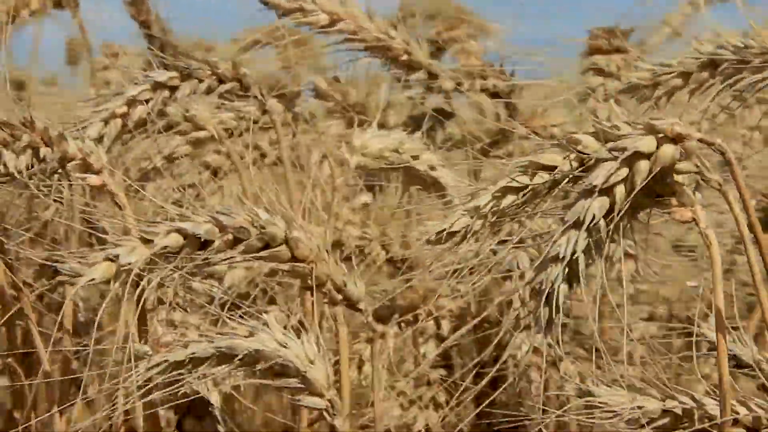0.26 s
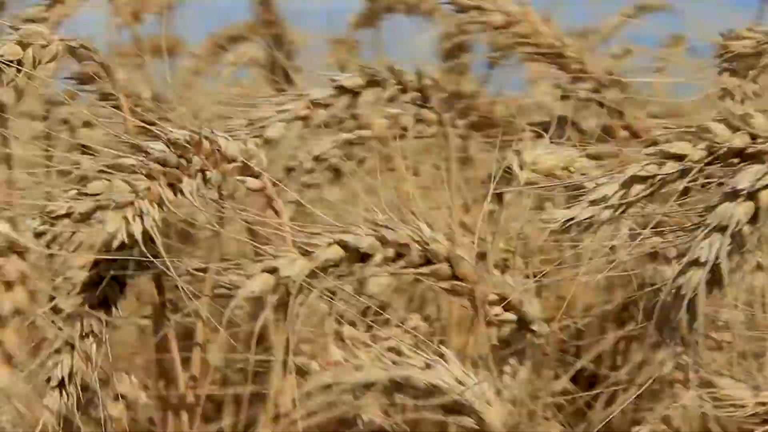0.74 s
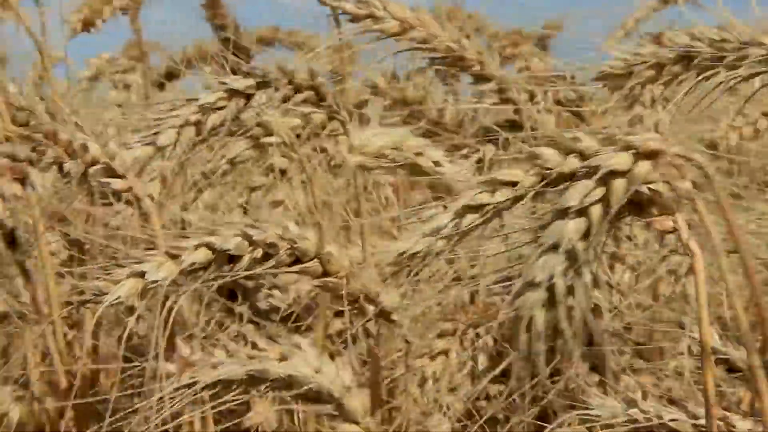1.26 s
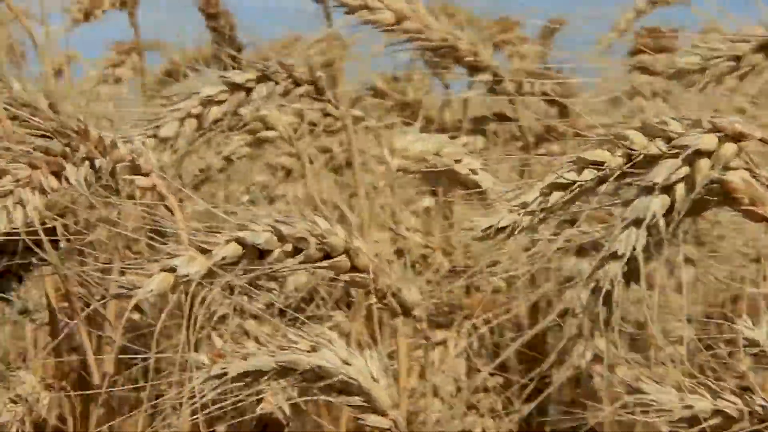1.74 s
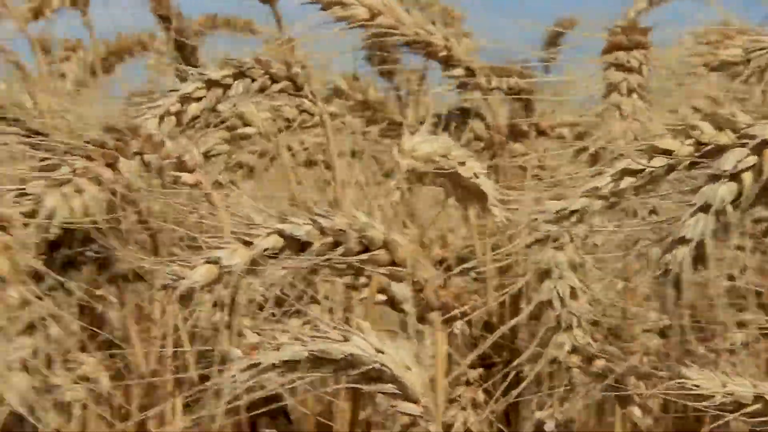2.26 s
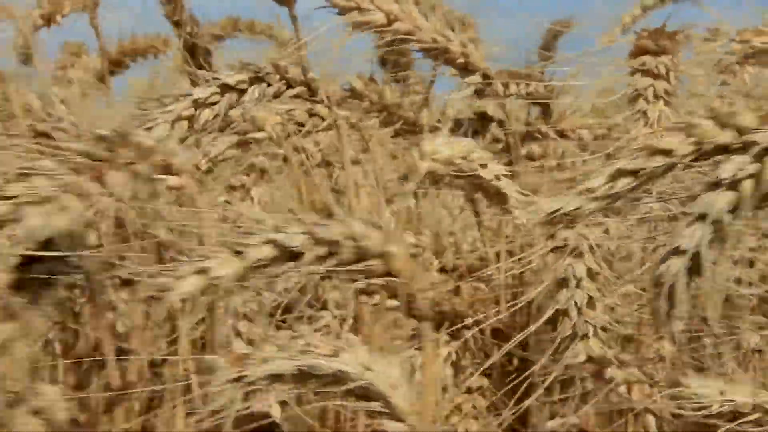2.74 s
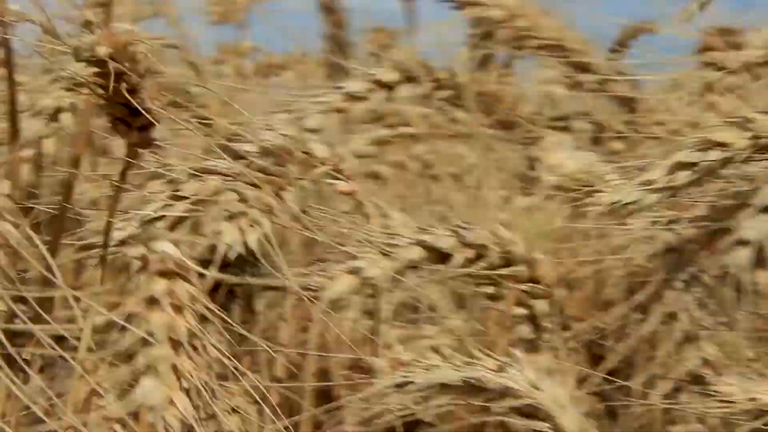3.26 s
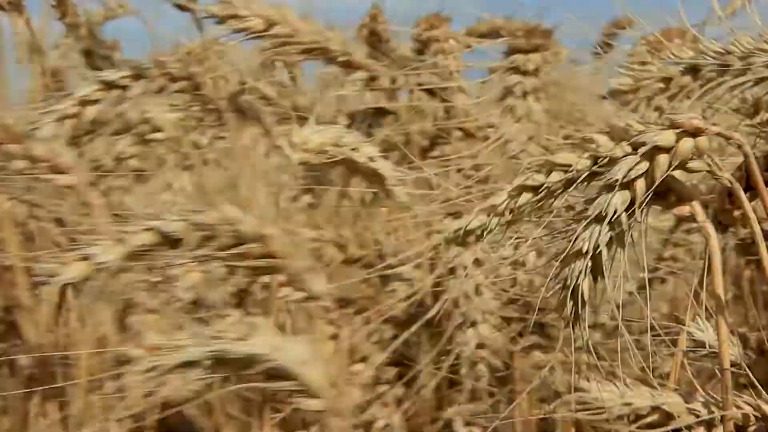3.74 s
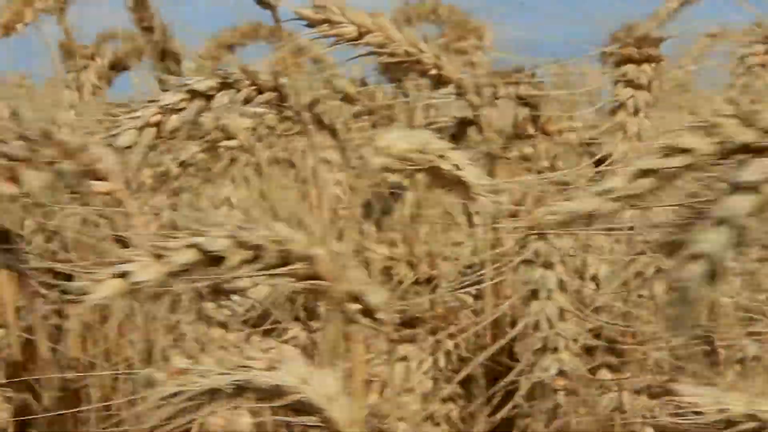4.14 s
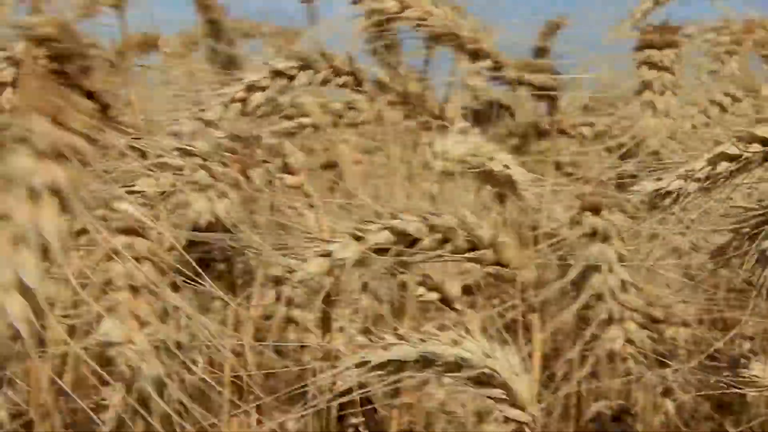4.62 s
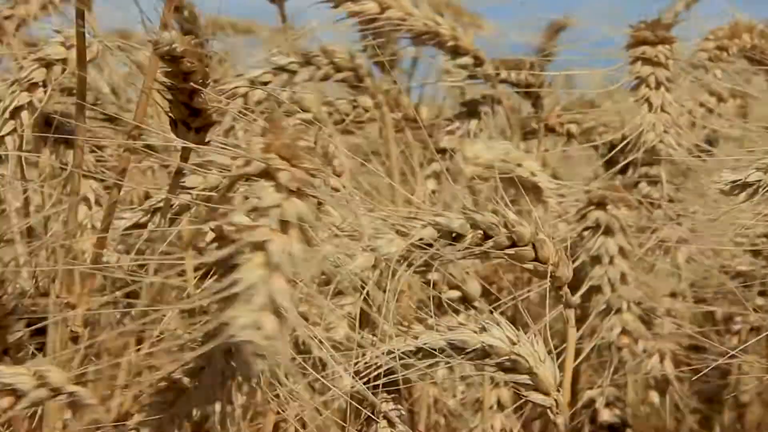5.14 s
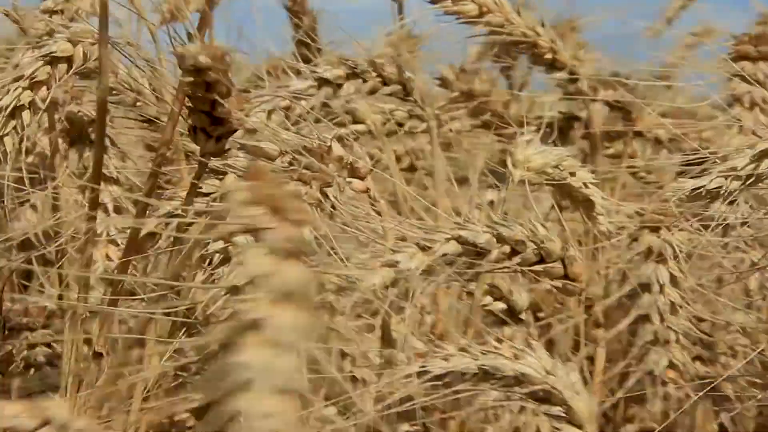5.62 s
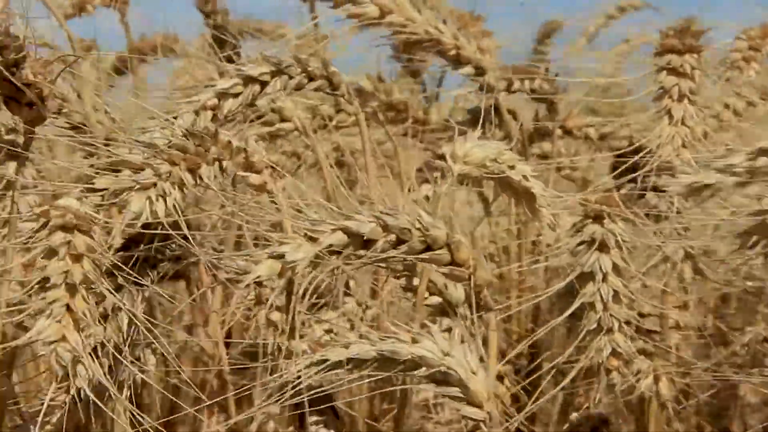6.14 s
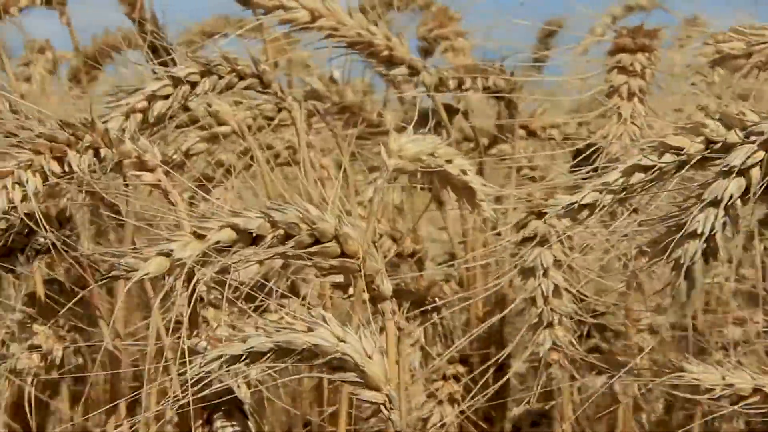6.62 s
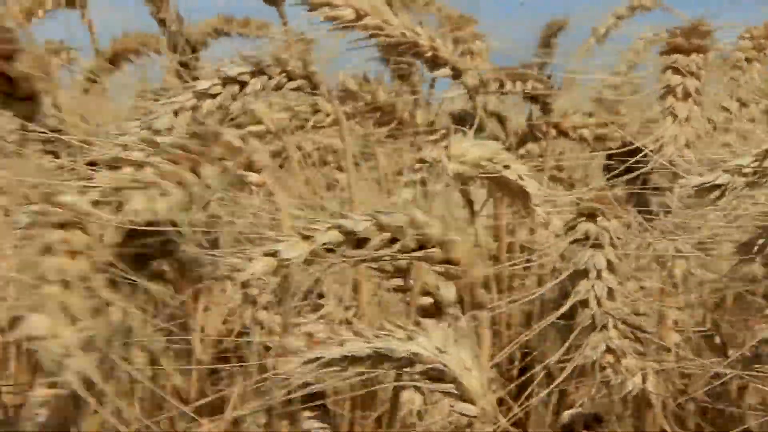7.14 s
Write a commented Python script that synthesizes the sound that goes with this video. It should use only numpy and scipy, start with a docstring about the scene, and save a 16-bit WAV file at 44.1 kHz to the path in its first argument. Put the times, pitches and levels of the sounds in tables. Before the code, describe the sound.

Gusts sweep a ripe wheat field: papery ears and awns hiss and tick, with deep fluttering wind noise bumping against the microphone throughout.

```python
"""Dry wheat in gusty wind: countless ears and awns rub and tick, noise and impulses coloured as a bright hiss.
Stalks further off brush in a duller wash, and the whole field soughs below it.
Eddies buffet two microphone ports in lumps of deep, roaring and whooshing noise, and in single sine thumps.
A faint low rumble of the recorder lies underneath."""
import sys
import numpy as np
from scipy import signal
from scipy.fft import rfft, irfft, next_fast_len
from scipy.io import wavfile
from scipy.ndimage import uniform_filter1d, map_coordinates

SR = 44100
rng = np.random.default_rng(int(sys.argv[2]) if len(sys.argv) > 2 else 0)


def digitize_waveform(pressure):
    """Quantize a signal to 16-bit integers and store it at the path in sys.argv[1].

    Rows of a 2-D input are taken as channels; values are limited to [-1, 1].
    """
    field = np.atleast_2d(pressure).T
    bounded = np.clip(field, -1, 1)
    quanta = np.round(bounded * 32767).astype(np.int16)
    wavfile.write(sys.argv[1], SR, quanta)


N = 325281


def amp(db):
    """Gain of a level in dB."""
    return 10 ** (np.asarray(db) / 20)


def unit(x):
    """x at rms 1."""
    return x / np.sqrt(np.mean(np.abs(x) ** 2) + 1e-20)


def along(points, hz, axis=1):
    """One column of a table read on a log frequency axis."""
    table = np.transpose(points)
    return np.interp(np.log(hz + 1), np.log(table[0] + 1), table[axis])


def curves(rows):
    """One value per sample for each column after the time."""
    s, *cols = np.transpose(rows)
    return [np.interp(np.arange(N) / SR, s, c) for c in cols]


def wobble(rate):
    """A smooth random curve, rate knots a second."""
    knots = rng.standard_normal(int(N * rate / SR) + 4)
    return map_coordinates(knots, [np.arange(N) * rate / SR])


def filtered(x, response):
    """x times a complex response of frequency."""
    m = next_fast_len(N + SR // 2)
    return irfft(rfft(x, m) * response(np.fft.rfftfreq(m, 1 / SR)), m)[..., :N]


def patchy(depth_db):
    """Two white noises under one field of random gain, patches of about 600 Hz by 60 ms."""
    z = signal.stft(rng.standard_normal((2, N)), nperseg=512)[2]
    field = rng.standard_normal(z.shape[1:])
    field = uniform_filter1d(field, size=7, axis=0)  # smooth over frequency
    field = uniform_filter1d(field, size=10, axis=1)  # smooth over time
    return signal.istft(z * amp(depth_db * unit(field)), nperseg=512)[1][:, :N]


def ports(pair, alike, lag):
    """The right port hears a lagging share of the left signal and the rest from a second one."""
    def right_port(hz):
        share = np.clip(alike(hz), 0, 1)
        return np.array([share * np.exp(-1j * lag(hz)), np.sqrt(1 - share ** 2)])

    common, own = filtered(pair, right_port)
    return np.array([pair[0], common + own])


def coloured(pair, spectrum):
    """The pair in the given colour, at rms 1; nothing at or below the first point."""
    return unit(filtered(pair, lambda hz: amp(along(spectrum, hz)) * (hz > spectrum[0][0])))


def panned(db):
    """Gains of the two channels for a left-over-right difference."""
    return amp(np.array([db / 2, -db / 2]))


# colour of the recorder's own rumble: f/Hz, level/dB per Hz
RUMBLE_COLOUR = [(12, -8), (30, -4), (60, -2), (90, -2), (200, -40)]


def recorder_rumble():
    """The recorder's self-noise: a faint, steady low noise."""
    return amp(-75) * coloured(patchy(depth_db=0.0), RUMBLE_COLOUR)


# wind over the whole field: t/s, level/dB
FIELD_WIND = [(0.0, -43.5), (.5, -42), (1.78, -47), (2.22, -45.5), (2.63, -47.5), (3.41, -44.5),
              (4.29, -46.5), (5.38, -43.5), (6.6, -50.5), (7.38, -52)]
# colour of the sough: f/Hz, level/dB per Hz
SOUGH_COLOUR = [(400, -29), (750, -1), (1200, -3), (1700, -6.5), (2400, -15), (4000, -45)]


def field_sough():
    """The whole field blends into a low sough that swells and sinks with the wind."""
    return amp(curves(FIELD_WIND)[0]) * coloured(patchy(depth_db=0.75), SOUGH_COLOUR)


# buffets on the microphone: crest t/s, length/s, roar level/dB, deep part over roar/dB, whoosh over roar/dB
BUFFETS = [(.07, 0.17, -30.5, -12, -6), (0.175, 0.11, -34, 0.5, -9), (0.345, 0.11, -37, -22, -1),
           (0.487, 0.19, -32.5, -9, -12), (0.694, 0.13, -30.5, -2, -7.5), (.82, 0.13, -31, -4.5, -9),
           (.96, 0.074, -35.5, -16, -16), (1.142, 0.29, -33, -4, -7), (1.514, 0.15, -36, -11, -8),
           (1.63, 0.25, -29, -7.5, -6.5), (1.807, 0.072, -32.5, -13, -3.5), (2.142, 0.25, -30, -9, -6),
           (2.243, 0.1, -31, -9, -7), (2.378, 0.092, -37.5, 1.5, 1.5), (2.574, .1, -41, 1, -4),
           (2.755, 0.18, -29, -9.5, -5.5), (2.906, 0.2, -32.5, -3.5, -2), (3.08, 0.17, -36.5, -7, -15),
           (3.294, 0.18, -31.5, -6, -11), (3.427, 0.15, -28, -3, -8), (3.716, 0.33, -33, -9.5, -6),
           (3.951, 0.23, -39, -13, -4), (4.153, .09, -31.5, -10, -7), (4.273, 0.17, -32, -6, -8),
           (4.425, .14, -37, -12, -4), (4.592, 0.23, -30, -14, -6.5), (4.702, 0.11, -35.5, -1.5, -3),
           (4.85, 0.3, -33, -11, -4), (5.184, 0.39, -30, -10, -3), (5.535, 0.32, -28.5, -7, -4.5),
           (5.8, .2, -27.5, -11, -6), (5.917, .14, -31.5, -11, -5), (6.063, 0.061, -32, -7, -12),
           (6.26, 0.25, -34, -12, -5.5), (6.52, 0.2, -32.5, -7.5, -7.5), (6.767, 0.081, -36.5, -16, -7),
           (7.03, .2, -35.5, -5, -11), (7.205, .1, -33.5, -14, -9), (7.31, 0.16, -32, -10, -15.5)]


def swells():
    """Levels in dB of roar, deep part and whoosh: a lull that follows the wind, with the buffets on top."""
    pointed = 1.95  # each buffet swells and ebbs as an arch; higher is more pointed
    t = np.arange(N) / SR
    lull_roar_db = -36 + 0.2 * gust()
    lull_deep_db = lull_roar_db - 12.5
    lull_whoosh_db = -40 + 0.5 * gust()
    power = amp(2 * np.array([lull_roar_db, lull_deep_db, lull_whoosh_db]))
    for crest_s, length_s, roar_db, deep_db, whoosh_db in BUFFETS:
        arch = np.clip(1 - (2 * (t - crest_s) / length_s) ** 2, 0, 1) ** pointed
        peaks_db = np.array([[roar_db], [roar_db + deep_db], [roar_db + whoosh_db]])
        power = power + amp(2 * peaks_db) * arch
    return 10 * np.log10(power)


# how the ports share the eddies: f/Hz, likeness/0-1, right behind left/rad
EDDY_SHARE = [(40, .4, 2.5), (90, 0.75, 2.4), (126, 0.78, 1.67), (168, 0.56, 2.36), (217, 0.53, 3.57),
              (270, 0.54, 3.94), (410, 0.51, 4.05), (505, 0.39, 2.88), (710, 0.67, 3.4), (990, 0.6, 2.44)]


def eddies_at_ports(turbulence, jolts):
    """The ports agree only partly on the turbulence, but each large jolt covers both; the right one lags."""
    lag = lambda hz: along(EDDY_SHARE, hz, axis=2)
    air = ports(turbulence, lambda hz: along(EDDY_SHARE, hz), lag)
    shared_jolts = ports(jolts, np.ones_like, lag)
    tilt_db = [(100, -1.5), (300, -0.3)]  # f/Hz, left over right/dB
    return filtered(air + shared_jolts, lambda hz: panned(along(tilt_db, hz)))


# colours of the three parts of a buffet: f/Hz, level/dB per Hz
DEEP_COLOUR = [(40, -47), (70, -17), (95, -6.5), (120, 0), (160, 0.5), (200, -5), (300, -35)]
ROAR_COLOUR = [(90, -34), (150, -8.5), (200, -2.5), (265, -0.2), (315, -5), (385, -2), (450, -8),
               (650, -43)]
WHOOSH_COLOUR = [(280, -40), (410, -5.5), (500, 1.6), (650, -3.5), (900, -14), (1300, -24), (2000, -30),
                 (3500, -66)]


def buffets():
    """Eddies tumble over both ports at once, so their noise comes in shared lumps."""
    roar_db, deep_db, whoosh_db = swells()
    lumps = wobble(30)  # quick flutter shared by the three parts
    deep_flutter = amp(0.76 * lumps + 1.1 * wobble(12))
    roar_flutter = amp(1.23 * lumps + 0.55 * wobble(70) + 1.45 * wobble(14))
    whoosh_flutter = amp(0.5 * lumps + 0.42 * wobble(60))
    deep = amp(deep_db) * unit(deep_flutter * coloured(patchy(depth_db=-0.1), DEEP_COLOUR))
    roar = amp(roar_db) * unit(roar_flutter * coloured(patchy(depth_db=-0.2), ROAR_COLOUR))
    whoosh = amp(whoosh_db) * unit(whoosh_flutter * coloured(patchy(depth_db=0.35), WHOOSH_COLOUR))
    return deep + roar + whoosh


# single eddies: start t/s, level/dB at the crest of the envelope, f/Hz
THUMPS = [(0.094, -15.5, 288), (0.778, -21, 339), (0.948, -29, 270), (1.534, -22, 262), (3.436, -12, 250),
          (3.706, -17.5, 350), (4.131, -28, 226), (4.365, -20.5, 253), (4.51, -12.5, 241),
          (4.786, -20, 275), (5.553, -10.5, 208), (5.739, -18, 132), (6.045, -31, 196), (7.261, -29, 247.4)]


def thumps():
    """Single eddies push the diaphragm into a few quickly fading swings, each a sine burst."""
    peak_s = 0.0042  # from the start of a thump to the crest of its envelope
    jolts, t = np.zeros((2, N)), np.arange(SR // 20) / SR
    envelope = (t / peak_s) ** 2 * np.exp(2 - 2 * t / peak_s)
    for start_s, db, hz in THUMPS:
        start = round(start_s * SR)
        push = amp(db) * np.sin(2 * np.pi * hz * t) * envelope
        jolts[0, start:][:len(t)] += push[:N - start]
    return jolts


def ticks(count):
    """Tiny dry contacts in the crop: impulses at random instants, of scattered strength and either sign."""
    rows = rng.standard_normal((count, 2))
    strength = amp(3 * np.clip(rows[:, 0], -2, 2))
    return unit(np.bincount(rng.integers(0, N, count), strength * np.sign(rows[:, 1]), N))


# colour of the stalks: f/Hz, level/dB per Hz
WASH_COLOUR = [(1000, -45), (1800, -8.5), (2400, -4), (3200, -1), (5000, -1), (7000, -7.5), (10000, -45)]


def stalk_wash(flutter):
    """Stalks further off brush in a duller wash that follows the gusts and their airy top."""
    _, airy_db, pan_db = curves(GUSTS)
    middling_airy_db = -3
    wash_db = -42 + 0.94 * gust() + 0.57 * (airy_db - middling_airy_db)
    brushing = patchy(depth_db=1.5) + 0.41 * np.array([ticks(count=6000), ticks(count=6000)])
    level = amp(wash_db + 0.35 * flutter + 0.58 * wobble(9))
    return level * panned(0.73 * pan_db) * coloured(brushing, WASH_COLOUR)


# gusts in the crop: t/s, hiss level/dB of the near ears, airy top over hiss/dB, hiss left over right/dB
GUSTS = [(0.0, -29, -0.5, 1.5), (.31, -26.5, -3, 2), (.53, -25, -3.5, 1.5), (1.15, -29.5, -3.5, 1),
         (1.39, -33, -7, 2), (1.6, -33, -5, 2), (1.99, -33.5, -2.5, 2), (2.12, -30, -5, 1.5),
         (2.2, -32, -2, 0), (2.65, -35, -4, 2), (3.27, -28.5, -6.5, 4), (3.47, -29, -3, 2),
         (3.55, -28, -3.5, 2), (4.27, -31, -6.5, 1), (4.6, -29.5, -3, 1.5), (5.01, -29.5, -4.5, 3.5),
         (5.18, -26.5, 1, .7), (5.34, -27.5, -2.5, 1), (5.7, -31, -0.5, 1.5), (5.83, -28.5, -4.5, 2),
         (6.28, -33, -3.5, -0.5), (6.66, -37, -6, 1.5), (7.21, -39.5, -5.5, 3.5), (7.38, -38.5, -3.5, 2)]


def gust():
    """How far the wind stands above a middling gust, in dB of hiss."""
    middling_hiss_db = -31
    return curves(GUSTS)[0] - middling_hiss_db


# colours of the near ears and their airy top: f/Hz, level/dB per Hz
HISS_COLOUR = [(2500, -43), (4000, -15.5), (6300, -8), (8300, -3), (10600, -0.2), (12500, -7.5),
               (14500, -18.5), (17000, -25)]
AIRY_COLOUR = [(8000, -37), (11500, -3.5), (13000, -1.5), (14500, -0.5), (17000, -6.5)]


def ear_hiss(flutter):
    """Near ears and awns rub and tick; one stream of contacts feeds both the hiss and its airy top."""
    hiss_db, airy_db, pan_db = curves(GUSTS)
    rubbing = patchy(depth_db=1.0) + 0.49 * np.array([ticks(count=15000), ticks(count=15000)])
    near = coloured(rubbing, HISS_COLOUR) + amp(airy_db) * coloured(rubbing, AIRY_COLOUR)
    return amp(hiss_db + 0.31 * flutter + 0.39 * wobble(40)) * panned(pan_db) * near


# how the ports share the crop: f/Hz, likeness/0-1, left over right/dB
CROP_SHARE = [(800, 0.69, -3), (1700, 0.57, -1), (2400, 0.48, 2), (3380, 0.86, 1), (4700, 0.38, 0.7),
              (8950, 0, 0.9), (11100, 0.23, 0.1), (13500, 0.07, -1), (15500, .24, 0.5)]


def crop():
    """Ears, stalks and the whole field sound together; what the ports share reaches the left one first."""
    lag_s = 5e-5
    flutter = wobble(14)  # small gusts stir near and far stalks together
    plants = ear_hiss(flutter) + stalk_wash(flutter) + field_sough()
    both = ports(plants, lambda hz: along(CROP_SHARE, hz), lambda hz: 2 * np.pi * hz * lag_s)
    return filtered(both, lambda hz: panned(along(CROP_SHARE, hz, axis=2)))


def scene():
    """The rustling crop with the wind on the microphone."""
    return eddies_at_ports(buffets(), thumps()) + crop()


def record(dry):
    """The wind filter thins the deepest bass, the recorder's rumble joins, and a band limit cuts the top."""
    low_cut_hz, top_hz = 100, 15830
    cut = filtered(dry, lambda hz: 1 / np.sqrt(1 + (low_cut_hz / (hz + 1)) ** 8))
    return filtered(cut + recorder_rumble(), lambda hz: hz < top_hz)


dry = scene()
out = record(dry)
digitize_waveform(out)
```